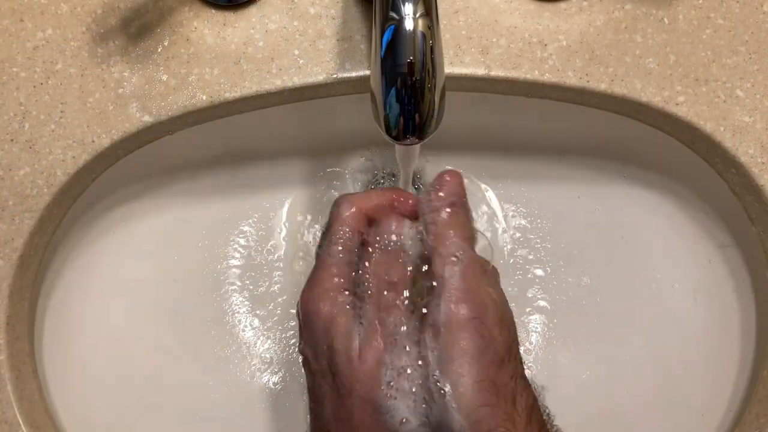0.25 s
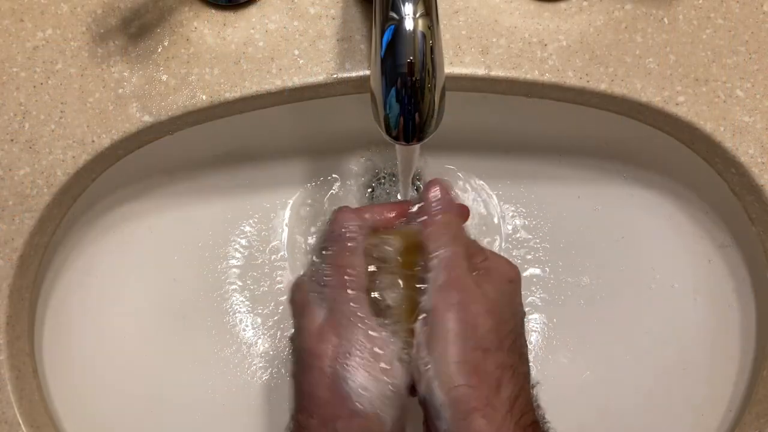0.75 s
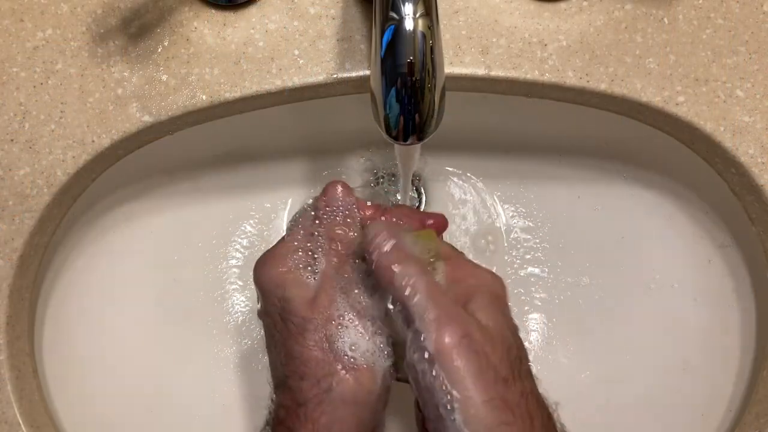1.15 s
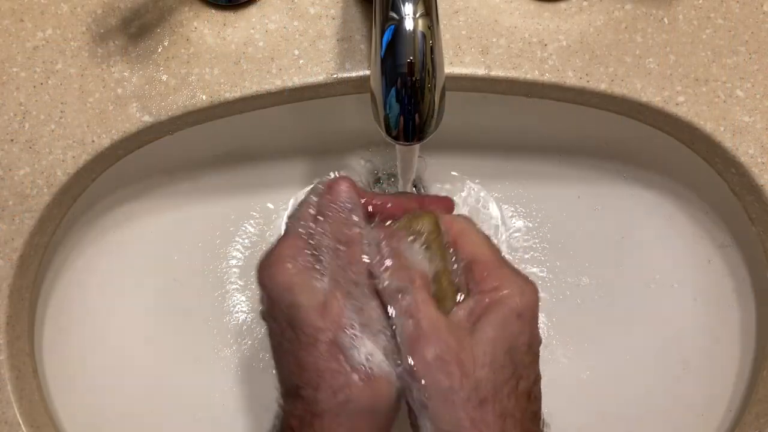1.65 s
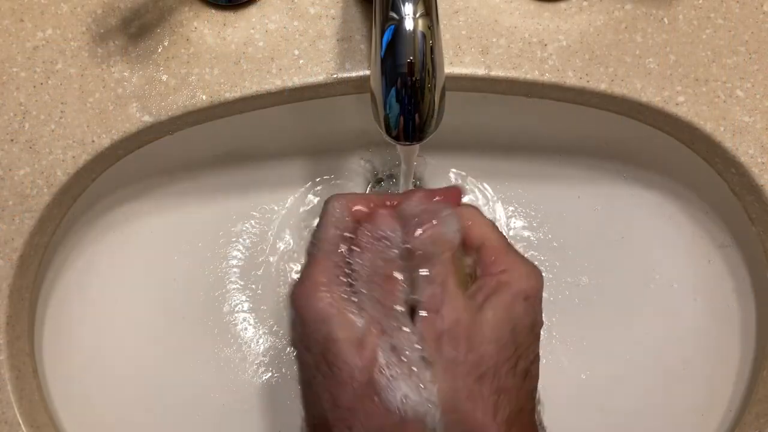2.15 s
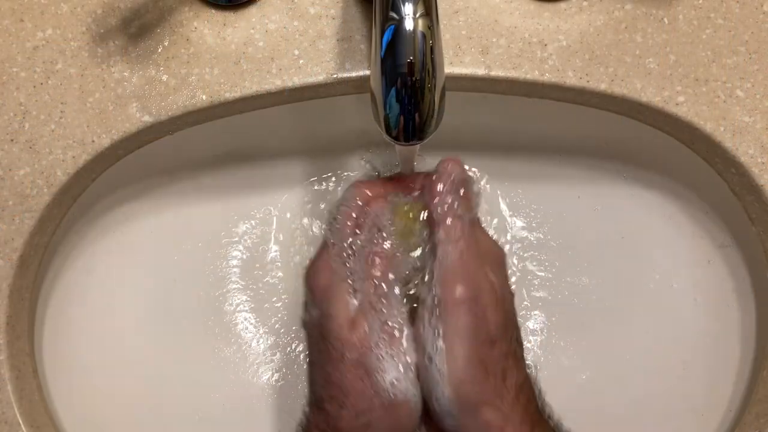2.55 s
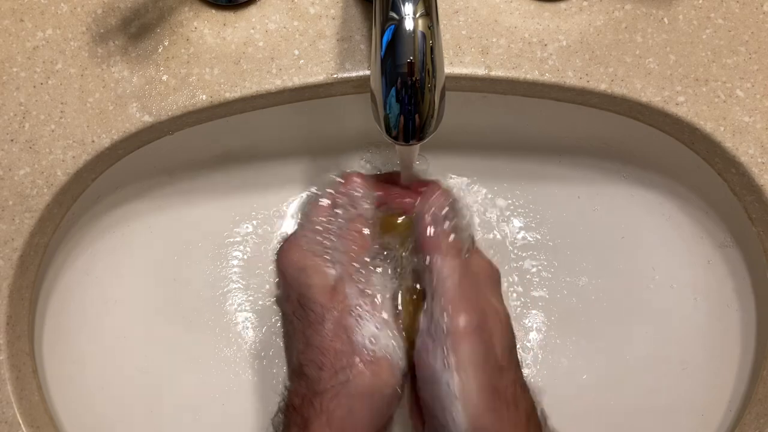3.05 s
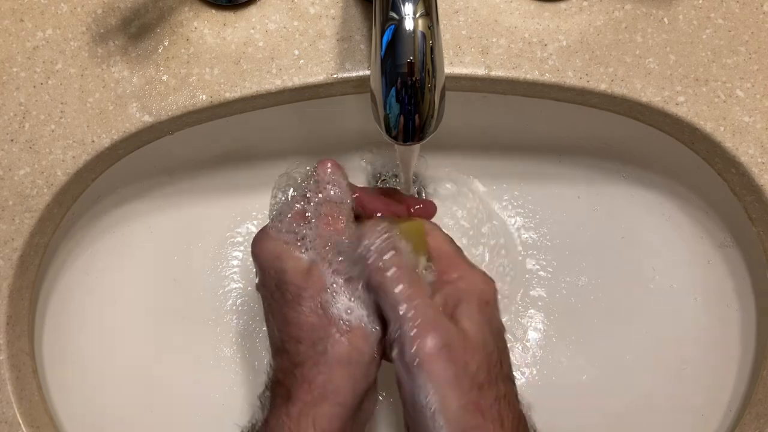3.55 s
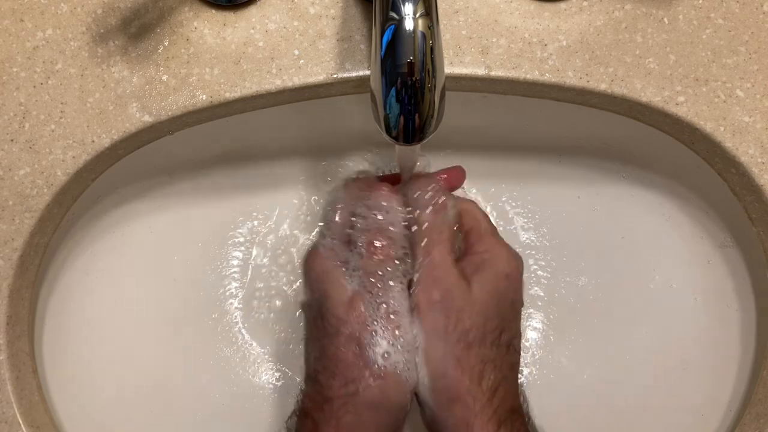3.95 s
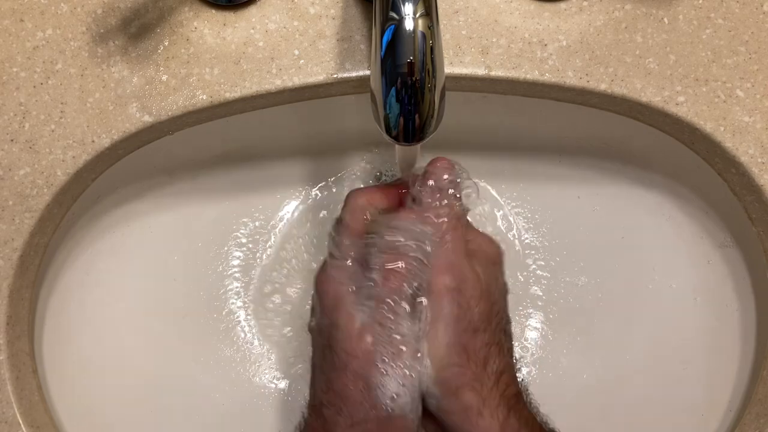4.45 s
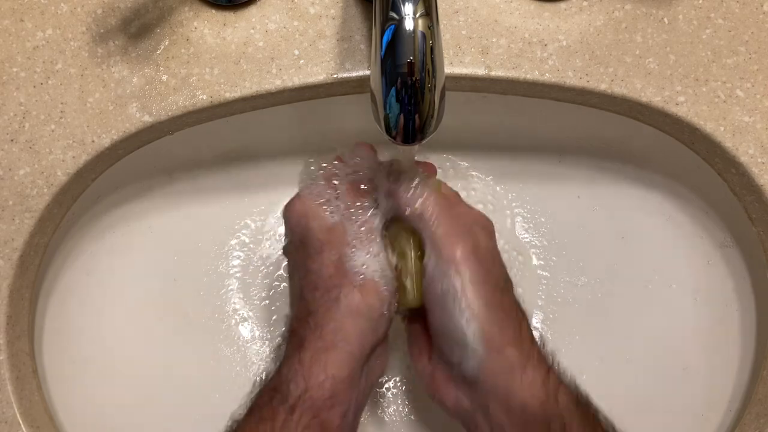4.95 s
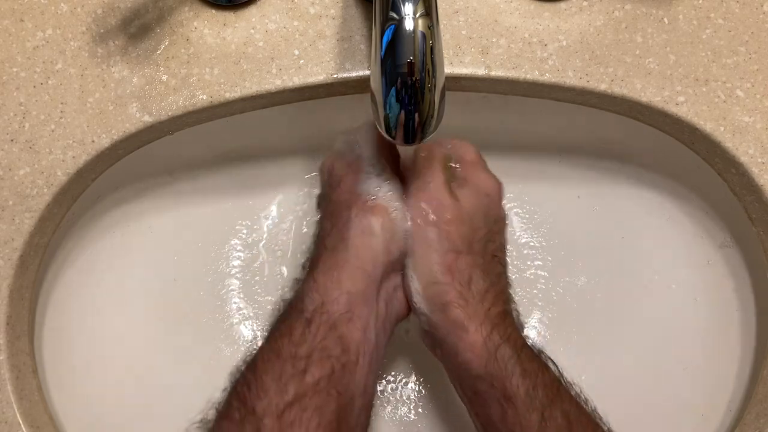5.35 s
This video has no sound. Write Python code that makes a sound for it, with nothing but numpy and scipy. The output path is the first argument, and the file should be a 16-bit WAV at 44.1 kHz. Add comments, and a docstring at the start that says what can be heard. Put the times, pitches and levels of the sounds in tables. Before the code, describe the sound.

Soapy hands squelch and crackle with foam close up while a thin stream of water runs quietly into a ceramic bathroom sink.

```python
"""A thin stream runs into a ceramic basin over a wet fizz: coloured noise mixed with swarms of tiny bubbles.
Two hands turn a bar of soap just above: foam bubbles snap (short tone and click) and air pockets
squelch between the palms (damped rising tone and wet slap), echoed by the bowl and a tiled room.
A motor hums in the building (two sines) over rumble; slow draughts push on the microphone, with rare soft knocks."""
import sys
import numpy as np
from scipy import signal
from scipy.fft import rfft, irfft, next_fast_len
from scipy.io import wavfile
from scipy.ndimage import map_coordinates

SR = 44100
rng = np.random.default_rng(int(sys.argv[2]) if len(sys.argv) > 2 else 0)


def dump(signal):
    """Clip the signal to [-1, 1] and save it as 16-bit WAV at the path in sys.argv[1]."""
    limited = np.clip(np.atleast_2d(signal).T, -1, 1)
    pcm = np.round(limited * 32767).astype(np.int16)
    wavfile.write(sys.argv[1], SR, pcm)


def attenuation_scalar(level_db):
    """Turn a level in dB into a linear amplitude multiplier (20 dB per decade)."""
    decades = np.asarray(level_db, float) / 20
    return 10 ** decades


N = 247401  # samples


def unit(x):
    """Scaled to rms 1."""
    return x / np.sqrt(np.mean(x ** 2) + 1e-20)


def along(points, hz):
    """(Hz, value) points interpolated on a log frequency axis."""
    point_hz, value = np.transpose(points)
    return np.interp(np.log(hz + 1), np.log(point_hz + 1), value)


def curves(rows):
    """One value per sample for each column after the time."""
    time_s, *columns = np.transpose(rows)
    return [np.interp(np.arange(N) / SR, time_s, column) for column in columns]


def wobble(knots_per_s):
    """A smooth random curve."""
    knots = rng.standard_normal(N // 100)
    return map_coordinates(knots, [np.arange(N) * knots_per_s / SR])


def filtered(x, response):
    """x times a response of frequency."""
    size = next_fast_len(N + SR // 2)
    return irfft(rfft(x, size) * response(np.fft.rfftfreq(size, 1 / SR)), size)[:N]


def flattened(x, spectrum):
    """Gives x the wanted long-term colour, rms 1."""
    hz, power = signal.welch(x, SR, nperseg=256)

    def correction(f):
        return attenuation_scalar(along(spectrum, f)) / np.sqrt(np.interp(f, hz, power) + 1e-12)

    return unit(filtered(x, correction))


def blips(start_s, level_db, pitch_hz, life_cycles, rise, size):
    """Sum of damped bubbles, size samples each; with rise > 0 the pitch climbs as each cavity closes."""
    turns = np.arange(size) / SR * pitch_hz[:, None]
    age = turns / np.maximum(life_cycles, .5)[:, None]
    wave = np.sin(2 * np.pi * turns * (1 + rise * np.minimum(age, 2)))
    onset = 1 - np.exp(-turns * 3)
    decay = np.exp(-age * 2)
    wave *= attenuation_scalar(level_db)[:, None] * onset * decay
    at = (start_s * SR).astype(int)[:, None] + np.arange(size)
    return np.bincount(at.ravel(), wave.ravel(), N + size)[:N]


def swarm(count, pitch_hz, spread, life_cycles, scatter_db, size):
    """Many random bubbles, mostly small with a few bigger ones, rms 1."""
    u, g = rng.random((count, 2)), rng.standard_normal(count)
    start_s = u[:, 0] * N / SR
    pitch = np.minimum(pitch_hz * np.exp(spread * g), SR / 3)
    bigness = np.minimum(-np.log(1 - u[:, 1]), 4)
    return unit(blips(start_s, scatter_db * bigness, pitch, np.full(count, life_cycles), 0.11, size))


def impulses(start_s, height):
    """One-sample kicks."""
    return np.bincount((start_s * SR).astype(int), height, N)[:N]


def cracks(start_s, level_db, life_s, spectrum):
    """Wide clicks: one sharp step of pressure and a dying breath of spray."""
    kicks = impulses(start_s, attenuation_scalar(level_db))
    fade = np.exp(-np.arange(400) / SR / life_s)
    spray = signal.fftconvolve(kicks, fade)[:N] * rng.standard_normal(N)
    click = 3 * kicks + 0.89 * spray
    return flattened(click, spectrum) * np.std(click)


# stream level, sloshing once and thinning near the end: start_s, level_db
STREAM_FLOW = [(0.0, -59.5), (0.41, -59), (0.45, -53.5), (0.5, -59), (1.92, -59), (4.34, -59.5),
               (4.6, -61.5), (5.61, -62.5)]
# stream colour before the drain rings: freq_hz, density_db (per Hz, relative)
STREAM_COLOUR = [(300, -41), (600, -9.5), (800, -1), (1400, -2.5), (2000, -8.5), (3500, -15.5), (7000, -28)]
# water column and drain resonances: center_hz, width_hz, gain_db
DRAIN_MODES = [(775, 37, -3.5), (1016, 76, -7), (1293, 92, -1), (1436, 45, -7), (1694, 130, -3.5)]


def stream():
    """Falling water: a smooth wash with fine bubbles, ringing the drain."""
    bubbles = swarm(count=4000, pitch_hz=1197, spread=0.351, life_cycles=7.05, scatter_db=1.5, size=500)
    water = flattened(rng.standard_normal(N) + 0.19 * bubbles, STREAM_COLOUR)

    def ring(f):
        modes = sum(attenuation_scalar(gain_db) * 1j * f * width_hz / (center_hz ** 2 - f * f + 1j * f * width_hz)
                    for center_hz, width_hz, gain_db in DRAIN_MODES)
        return .5 + abs(modes)

    level_db = curves(STREAM_FLOW)[0] + 1.14 * wobble(21.76)
    return attenuation_scalar(level_db) * unit(filtered(water, ring))


def foam(level_db, spectrum, bubbles, hiss, clump_db):
    """Clumped bubbles on a bed of wet hiss."""
    mix = flattened(bubbles + hiss * rng.standard_normal(N), spectrum)
    clumps = attenuation_scalar(clump_db * (wobble(23) + wobble(70)))
    return attenuation_scalar(level_db) * unit(mix * clumps)


# fizz and snap colour: freq_hz, density_db (per Hz, relative)
FIZZ_COLOUR = [(2000, -27.5), (3000, -19.5), (4500, -12), (6000, -10.5), (7300, -8), (8600, -1), (9300, -3),
               (10200, -10), (12000, -6), (13600, -4), (15000, -12.5), (15900, -17)]


def fizz(level_db):
    """Tiny foam bubbles: very short high blips in hiss."""
    bubbles = swarm(count=5000, pitch_hz=10040, spread=0.338, life_cycles=8.1, scatter_db=2.5, size=60)
    return foam(level_db, FIZZ_COLOUR, bubbles, hiss=1.21, clump_db=0.92)


# lather colour: freq_hz, density_db (per Hz, relative)
LATHER_COLOUR = [(1200, -49), (1900, -15), (2500, -10), (3200, -4.5), (5000, -4.5), (6500, -3.5),
                 (8500, -8.5), (11000, -30)]


def lather(level_db):
    """Larger foam bubbles: lower, longer blips in hiss."""
    bubbles = swarm(count=2500, pitch_hz=3900, spread=0.345, life_cycles=12.2, scatter_db=4.0, size=200)
    return foam(level_db, LATHER_COLOUR, bubbles, hiss=1.0, clump_db=1.68)


def stirred(level_db, start_s, peak_db):
    """Each squelch stirs the lather: adds a fading swell of power to its level."""
    stir_db, fade_s = -28.5, 0.05  # stir_db is against the squelch peak
    kicks = impulses(start_s, attenuation_scalar(peak_db + stir_db) ** 2)
    swell = signal.fftconvolve(kicks, np.exp(-np.arange(SR // 2) / SR / fade_s))[:N]
    return 10 * np.log10(attenuation_scalar(level_db) ** 2 + abs(swell))


# motor tones: pitch_hz, level_db (rms)
HUM_TONES = [(59, -66), (500, -82.5)]
# rumble colour: freq_hz, density_db (per Hz, relative)
RUMBLE_COLOUR = [(30, -8), (50, -17), (78, -7), (100, -1.5), (161, -1.5), (195, -15), (247, -5.5),
                 (290, -11.5), (344, -5.5), (550, -12), (800, -22)]
# draughts: start_s, level_db
DRAUGHT_LEVEL = [(0.0, -36.5), (0.9, -55), (1.33, -34.5), (1.76, -39.5), (2.31, -52.5), (2.72, -46),
                 (2.95, -67), (3.31, -38), (3.48, -39.5), (4.28, -72), (4.98, -60.5), (5.61, -65)]
# soft knocks on the basin: start_s, peak_db (nominal), pitch_hz
BASIN_KNOCKS = [(.73, -56, 327), (3.603, -53, 674), (5.58, -51, 332)]


def building():
    """Motor hum as drifting sines, rumble and draughts as filtered noise, knocks as damped sines."""
    drift_s = np.cumsum(1 + 0.0014 * wobble(1.49)) / SR
    hum = sum(attenuation_scalar(level_db + 1.3 * wobble(3.25)) * np.sqrt(2) * np.sin(2 * np.pi * pitch_hz * drift_s)
              for pitch_hz, level_db in HUM_TONES)
    rumble = attenuation_scalar(-65) * flattened(rng.standard_normal(N), RUMBLE_COLOUR)
    push = unit(filtered(rng.standard_normal(N), lambda f: f / (1 + (f / 3.3) ** 4)))
    draught = attenuation_scalar(curves(DRAUGHT_LEVEL)[0]) * push
    start_s, peak_db, pitch_hz = np.transpose(BASIN_KNOCKS)
    knocks = blips(start_s, peak_db, pitch_hz, np.full(len(start_s), 9.), rise=0, size=4000)
    return hum + rumble + draught + knocks


def snaps(start_s, peak_db, pitch_hz):
    """Foam bubbles bursting: a very short tone and a click."""
    tone = blips(start_s, peak_db, pitch_hz, np.full(len(start_s), 4.5), rise=0.0092, size=100)
    return tone + cracks(start_s, peak_db - 15.5, 0.0015, FIZZ_COLOUR)


# slap colour: freq_hz, density_db (per Hz, relative)
SLAP_COLOUR = [(500, -24.5), (1200, -12), (2200, 2), (5500, 10), (8500, -17.5), (12000, -15)]


def squelches(start_s, peak_db, pitch_hz, life_cycles, slap_db):
    """Air pockets closing: a bubble tone and a wet slap."""
    tone = blips(start_s, peak_db, pitch_hz, life_cycles, rise=0.027, size=500)
    return tone + cracks(start_s, peak_db + slap_db, 0.00063, SLAP_COLOUR)


def strays(foam_db, over_db, scatter_db, pitch_hz, spread, count):
    """Random small events, louder where the foam is livelier: start_s, peak_db, pitch_hz."""
    start_s, g = rng.random(count) * (N - 1) / SR, rng.standard_normal((count, 2))
    peak_db = foam_db[(start_s * SR).astype(int)] + over_db + scatter_db * g[:, 0]
    return start_s, peak_db, np.minimum(pitch_hz * np.exp(spread * g[:, 1]), SR / 3)


# bowl echoes: delay_s, gain_db (before bowl_db)
BOWL_ECHOES = [(.00125, 2), (.0026, -13), (.0041, -8), (.0078, -14)]
# tiled room decay: freq_hz, t60_s
TILE_DECAY = [(500, 0.16), (3000, 0.072), (12000, 0.019)]


def bathroom(x, bowl_db, tiles_db):
    """The bowl throws back a few copies; the tiles add a noise tail that dies faster in the treble."""
    out, step = np.pad(x, (0, SR)), SR // 8
    for delay_s, gain_db in BOWL_ECHOES:
        out[round(delay_s * SR):][:N] += attenuation_scalar(gain_db + bowl_db) * x
    for start in range(0, N, step):  # tail redrawn every eighth of a second
        hz, t, z = signal.stft(rng.standard_normal(SR // 5), SR, nperseg=128)
        decay = attenuation_scalar(-60 * t / along(TILE_DECAY, hz)[:, None])
        tail = signal.istft(z * decay, SR, nperseg=128)[1]
        wet = signal.fftconvolve(x[start:start + step], attenuation_scalar(tiles_db) * tail / np.linalg.norm(tail))
        out[start + 110:][:len(wet)] += wet  # 110 samples: 2.5 ms delay
    return out[:N]


# foam between the palms: start_s, lather_db (before stirring), fizz_db
RUB_LEVELS = [(0.0, -63.5, -54.5), (0.45, -66.5, -53.5), (0.6, -72.5, -54), (1.4, -65.5, -55.5),
              (1.67, -54.5, -51.5), (1.84, -66.5, -51.5), (2.1, -59, -52), (2.48, -61.5, -52.5),
              (2.6, -64, -58.5), (2.82, -58, -55), (2.9, -44, -51), (2.98, -57, -50.5), (3.27, -57, -59.5),
              (3.34, -55, -52), (3.61, -53.5, -51.5), (3.86, -58.5, -58), (4.23, -52, -51.5),
              (4.53, -59, -56.5), (4.68, -54.5, -52), (4.9, -57, -53.5), (5.15, -65.5, -58),
              (5.26, -56.5, -58.5), (5.4, -68, -65), (5.61, -67, -65)]
# louder foam bursts: start_s, peak_db (nominal, dry tone), pitch_hz
LOUD_SNAPS = [(0.0417, -27, 8500), (0.237, -28.5, 8750), (0.2876, -26.5, 8700), (0.4168, -28, 11840),
              (0.4376, -25, 12120), (0.5087, -24, 9300), (0.5595, -31, 8850), (0.791, -30, 13720),
              (0.8126, -22, 10600), (0.8617, -30.5, 10600), (0.9397, -28, 8900), (0.973, -31, 9000),
              (1.1525, -30, 8610), (1.25, -27.5, 12080), (1.3126, -25.5, 10400), (1.544, -20, 8700),
              (1.6662, -25, 9100), (1.711, -24, 14690), (1.7423, -21.5, 8700), (1.7767, -24.5, 8700),
              (1.961, -23.5, 12500), (1.998, -27, 13000), (2.0854, -26, 8100), (2.1861, -19, 7650),
              (2.2104, -14.5, 13650), (2.233, -18.5, 13400), (2.254, -16.5, 8400), (2.282, -24, 13720),
              (2.309, -23.5, 13600), (2.371, -22, 8500), (2.4482, -25.5, 8600), (2.5448, -22, 8140),
              (2.87, -24, 7700), (2.935, -22.5, 7670), (3.356, -24, 8700), (3.462, -28, 9100),
              (3.5544, -20, 13000), (4.194, -23, 8200), (4.7739, -29.5, 8500), (4.7856, -29, 13900),
              (4.8753, -23, 9400)]
# louder air pockets: start_s, peak_db (nominal, dry tone), pitch_hz, life_cycles, slap_db (against the peak)
LOUD_SQUELCHES = [(0.2355, -40, 4050, 4.6, -12), (0.286, -32.5, 5960, 7.5, -19),
                  (0.446, -39.5, 1820, 5.5, -11), (1.1985, -37.5, 1900, 6, -15),
                  (1.2461, -26.5, 4500, 1.3, 2), (1.5098, -38, 3500, 5.3, -2), (1.571, -29, 5470, 5.8, -18),
                  (1.658, -31, 3610, 14, -11), (1.8815, -24.5, 2140, 5, -8), (2.0826, -38.5, 3720, 2.5, 5),
                  (2.2298, -32.5, 5700, 3.7, -8), (2.254, -29, 3900, 11, -31),
                  (2.327, -30.5, 2800, 6.6, -14), (2.5451, -25, 4500, 2, 3.5),
                  (2.594, -28.5, 5370, 5.3, -15), (2.6948, -37.5, 3300, 3.5, -6.5),
                  (2.7737, -37, 3870, 8.3, -16), (2.809, -37.5, 3460, 6, -11), (2.8836, -34, 5000, 4, -4),
                  (2.896, -25, 4820, 5.8, -20), (2.908, -29.5, 3070, 6.6, -17),
                  (2.9316, -32, 5920, 4.8, -13), (3.005, -37.5, 3000, 7.7, -16),
                  (3.064, -35, 3200, 7.8, -25), (3.153, -26.5, 2020, 5.5, -15.5),
                  (3.448, -36, 1500, 4.4, -20), (3.559, -34, 3140, 5.2, -12), (3.6054, -24, 3190, 11, -17),
                  (3.655, -33.5, 3230, 4.5, -20), (3.7016, -32, 4670, 4.9, -12),
                  (3.9218, -33.5, 3670, 6.7, -11), (4.03, -32.5, 5730, 6.7, -17),
                  (4.079, -34, 4370, 6.1, -17), (4.233, -26.5, 3280, 5.4, -27),
                  (4.2764, -25, 4700, 4.1, -12), (4.326, -34, 2730, 6.5, -13),
                  (4.409, -38.5, 1980, 7.9, -19), (4.456, -31.5, 3500, 5.4, -8.5),
                  (4.61, -41, 3150, 3.6, -5), (4.696, -39, 3400, 4.8, -14), (5.4823, -36, 2350, 6.3, -19)]


def hands():
    """Soapy palms: a bed of lather and fizz, with single squelches and snaps above it."""
    lather_db, fizz_db = curves(RUB_LEVELS)
    pockets = np.transpose(LOUD_SQUELCHES)
    bed = fizz(fizz_db) + lather(stirred(lather_db, *pockets[:2]))

    small_snaps = strays(fizz_db, over_db=21.5, scatter_db=3.3, pitch_hz=10750, spread=0.3, count=70)
    snap = snaps(*np.transpose(LOUD_SNAPS)) + snaps(*small_snaps)

    small_pockets = strays(lather_db, over_db=15.7, scatter_db=3.7, pitch_hz=4450, spread=0.29, count=60)
    squelch = squelches(*pockets) + squelches(*small_pockets, life_cycles=np.full(60, 4.5), slap_db=-13)

    # squelches happen low in the bowl and ring it; snaps sit on the knuckles, facing the microphone
    return bed + bathroom(snap, bowl_db=-11, tiles_db=-14) + bathroom(squelch, bowl_db=-8, tiles_db=-9)


def scene():
    """Stream, hands and building in one channel."""
    return (stream() + hands() + building())[None]


def top_cut(x):
    """Nothing passes above the cut-off."""
    return signal.sosfilt(signal.butter(12, 16050, fs=SR, output="sos"), x)


def record(dry):
    """Band-limits the mix below top_hz and returns the finished sound."""
    top_hz = 16000
    mix = filtered(dry[0], lambda hz: hz < top_hz)[None]
    return top_cut(mix)


dry = scene()
out = record(dry)
dump(out)
```